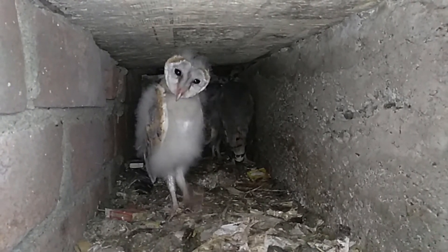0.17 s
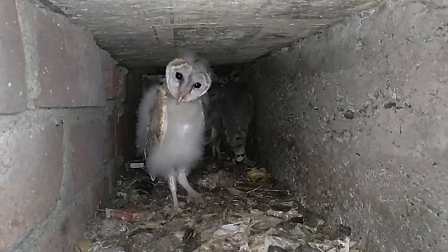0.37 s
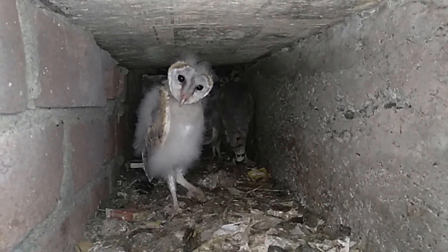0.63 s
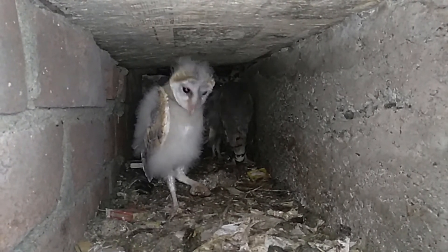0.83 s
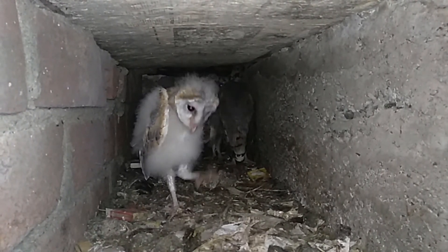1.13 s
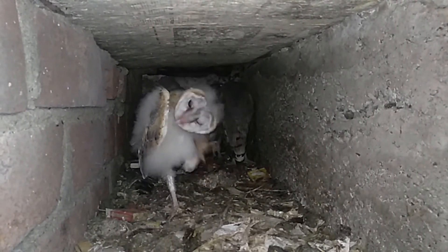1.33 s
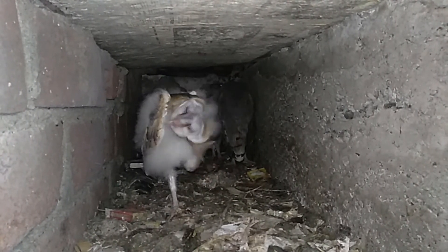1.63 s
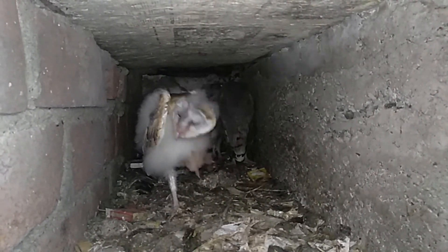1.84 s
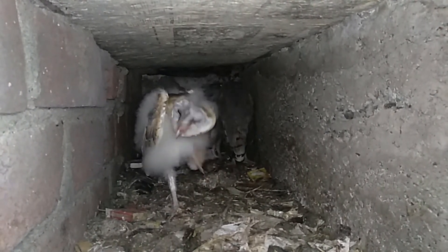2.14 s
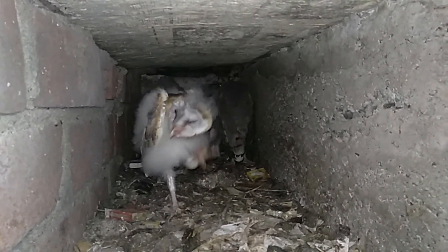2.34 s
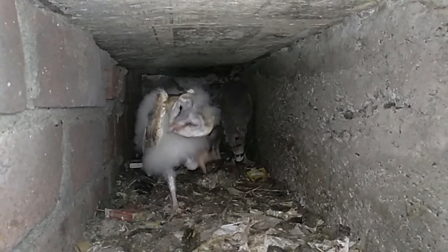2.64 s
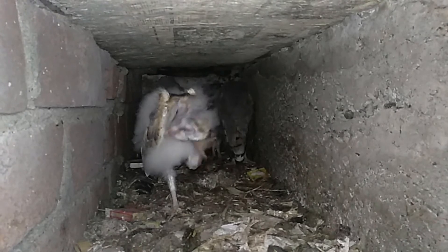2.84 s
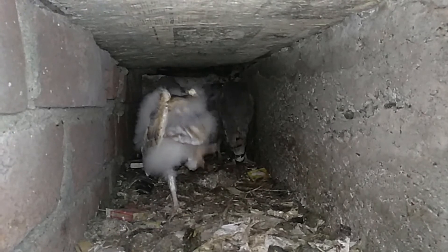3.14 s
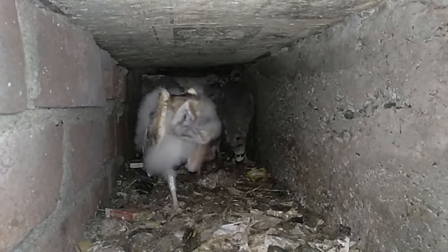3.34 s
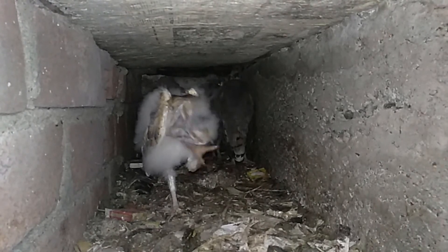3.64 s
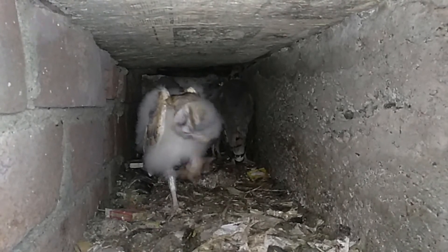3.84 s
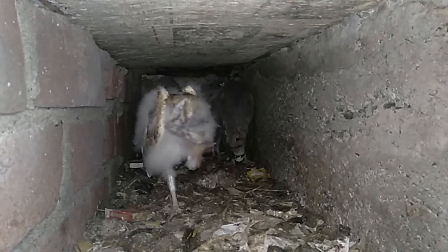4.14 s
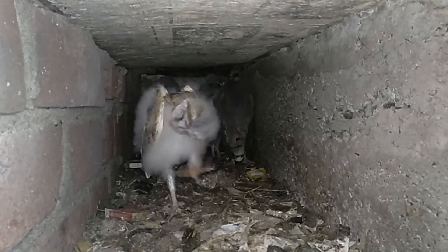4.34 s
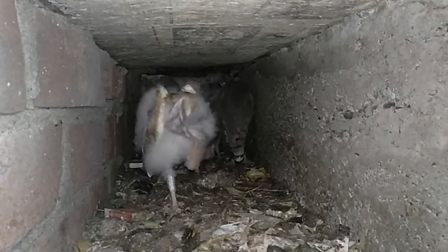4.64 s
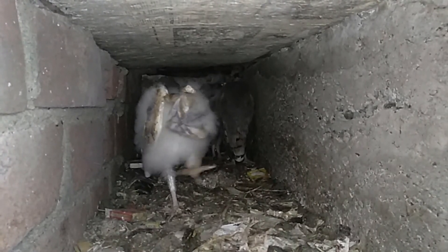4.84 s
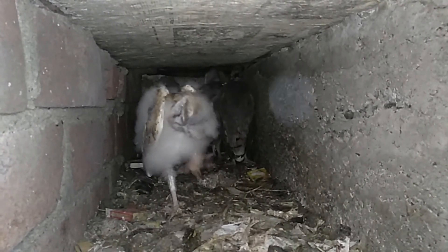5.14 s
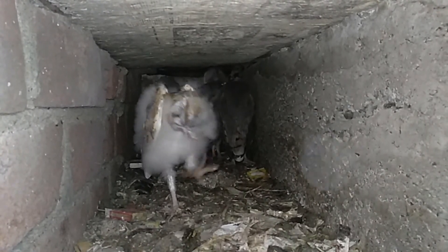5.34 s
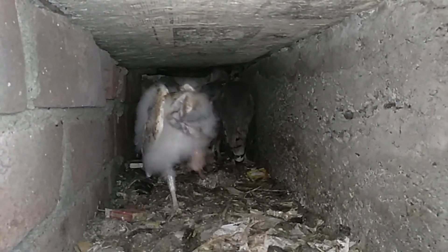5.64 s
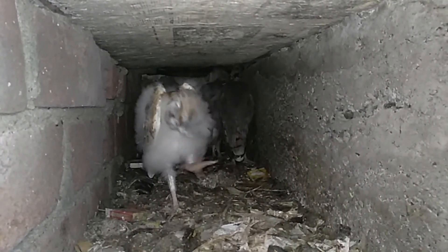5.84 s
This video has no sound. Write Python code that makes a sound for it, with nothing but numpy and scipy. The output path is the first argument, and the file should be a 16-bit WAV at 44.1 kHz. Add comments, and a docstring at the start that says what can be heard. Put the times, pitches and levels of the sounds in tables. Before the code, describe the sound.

A barn owlet is heard close up in a narrow masonry shaft, with short dense wall reflections and a quiet, wavering low rumble under a trace of hiss. At about 0.07, 0.17 and 0.29 seconds come three sharp, hard knocks; the second is strongest, with a hollow low boom. A faint whir fades after them, with soft muffled foot thuds until about 1.2. Light feathery swishes pass mostly between 1 and 2.4. From about 1.5, tiny dry bill ticks run at roughly six per second, unevenly accented, one clearer near 2.36. Low thuds lead into one loud, harsh, noisy screech from 3.5 to 4.16, bright and rasping, opening up as it goes, without clear pitch. It cuts off with a low puff and a very brief falling squeak near 4.18. Quiet nibbling resumes from 4.25, with occasional soft thuds, stronger around 5.6, until six seconds.

```python
"""A barn owlet in a narrow masonry nest shaft, close to the microphone, over a steady low rumble.
Three sharp knocks come first: impulses ring modes of the struck surface and of the air in the shaft.
Then the owlet shuffles, as low-passed thuds, and preens with tiny regular bill ticks of gated noise.
One harsh screech, a noise jet through gliding resonances, ends in a low puff and a falling squeak of partials.
Ticks and thuds go on; dense, quickly fading random echoes give the sounds the closeness of the walls."""
import sys
import numpy as np
from scipy import signal
from scipy.fft import rfft, irfft
from scipy.io import wavfile

SR = 44100
rng = np.random.default_rng(int(sys.argv[2]) if len(sys.argv) > 2 else 0)


def waveform_to_disk(signal):
    """Save audio, clipped to [-1, 1], as 16-bit WAV at the path in sys.argv[1]."""
    frames = np.transpose(np.atleast_2d(signal))
    scaled = np.clip(frames, -1, 1) * 32767
    samples = np.round(scaled).astype(np.int16)
    wavfile.write(sys.argv[1], SR, samples)


N = 264820
T = np.arange(N) / SR  # s
SHAFT_RING_HZ = 5200
SCREECH_START_S, SCREECH_END_S = 3.515, 4.164


def from_db(db):
    """Logarithmic level: decibels to amplitude gain."""
    return 10 ** (np.asarray(db) / 20)


def rms_one(x):
    """Power normalisation: scale to unit mean square."""
    return x / np.sqrt(np.mean(x ** 2) + 1e-20)


def low_pass(x, order, hz):
    """Butterworth filtering: a maximally flat pass band below the cutoff."""
    return signal.sosfilt(signal.butter(order, hz, fs=SR, output="sos"), x)


def dull(x, hz):
    """First-order absorption: a gentle loss of treble."""
    return low_pass(x + 1e-18, 1, min(hz, SR / 3))


def coloured(points):
    """Spectral shaping: noise of rms 1, its spectrum interpolated over log frequency."""
    hz, db = np.transpose(points)
    bins_hz = np.maximum(np.fft.rfftfreq(N, 1 / SR), 1)
    gain = from_db(np.interp(np.log(bins_hz), np.log(hz), db))
    return rms_one(irfft(rfft(rng.standard_normal(N)) * gain, N))


def resonate(x, hz, width_hz):
    """Damped resonance: a pole pair with unit gain at its peak."""
    r = np.exp(-np.pi * width_hz / SR)
    feedback = [1, -2 * r * np.cos(2 * np.pi * hz / SR), r * r]
    return signal.lfilter(np.array([1, 0, -1]) * (1 - r * r) / 2, feedback, x + 1e-18)


def noise_band(hz, width_hz):
    """Cascaded resonance: turbulence passes twice, which steepens the sides of the band."""
    once = resonate(rng.standard_normal(N), hz, width_hz)
    return resonate(once, hz, width_hz)


def flutter(rate_hz):
    """Random modulation: low-passed noise of spread 1."""
    return rms_one(low_pass(rng.standard_normal(N), 2, rate_hz))


def ramp(start_s, length_s):
    """Linear onset: an even rise from 0 to 1."""
    return np.clip((T - start_s) / length_s, 0, 1)


def swell(at_s, half_s, order=2):
    """Bell-shaped envelope of height 1; a higher order flattens its top."""
    return np.exp(-np.minimum(((T - at_s) / half_s) ** order, 50))


def strikes(times, level_db):
    """Impulsive excitation: one single-sample impulse for each contact."""
    out = np.zeros(N)
    out[np.round(np.asarray(times) * SR).astype(int)] = from_db(level_db)
    return out


def fade(clicks, t60):
    """Exponential decay: each impulse becomes an envelope that loses 60 dB in t60 seconds."""
    return signal.lfilter([1], [1, -from_db(-60 / (t60 * SR))], clicks + 1e-18)


def ring(clicks, hz, t60):
    """Modal impulse response: a unit impulse starts a decaying sine of initial height 1."""
    r = from_db(-60 / (t60 * SR))
    w = 2 * np.pi * hz / SR
    return signal.lfilter([0, np.sin(w)], [1, -2 * r * np.cos(w), r * r], clicks + 1e-18)


def background(ring_db=-96.0, waver_db=2.5, waver_top_hz=250, ring_waver_db=2.0):
    """Stationary coloured noise: a rumble whose bass wavers, with a thin band of hiss."""
    # spectrum of the rumble: f/Hz, relative level/dB
    rumble_colour = [(25, -20.5), (50, -16), (80, -1), (105, 7.5), (155, -12), (200, 1), (255, -14),
                     (340, -20.5), (480, -20.5), (700, -29), (1000, -29.5), (2300, -37), (6500, -46.5),
                     (9000, -49)]
    rumble = from_db(-64.0) * coloured(rumble_colour)
    bass_change = from_db(waver_db * flutter(4)) - 1
    rumble = rumble + bass_change * dull(rumble, waver_top_hz)
    hiss = rms_one(noise_band(SHAFT_RING_HZ, 340))
    return rumble + from_db(ring_db + ring_waver_db * flutter(5)) * hiss


def whir(peak_s=.53, half_s=.4, hz=975, width_hz=150, level_db=-87.5):
    """Band-limited noise: a faint narrow whir that swells and dies away, peaking after the knocks."""
    return from_db(level_db) * swell(peak_s, half_s) * rms_one(noise_band(hz, width_hz))


def boom(clicks, build_hz):
    """Coupled resonance: the air in the shaft takes time to swing up after an impulse."""
    # air modes of the shaft: f/Hz, relative level/dB, t60/s of the ring before build-up
    boom_modes = [(59.8, -17, 0.041), (125, 2, .065), (182, 0, 0.042)]
    out = np.zeros(N)
    for hz, db, t60 in boom_modes:
        out += from_db(db) * 2 * resonate(ring(clicks, hz, t60), hz, build_hz)
    return out


def knocks(crack_t60=0.011, crack_width_hz=1800, crack_floor_db=-3.5, crack_top_hz=4500):
    """Modal excitation: each blow touches, then cracks, rings the surface and sets the shaft booming."""
    # blows, levels relative: t/s, boom level/dB, boom build-up width/Hz, clack level/dB,
    # favoured clack f/Hz, loss away from it/(dB per octave), crack level/dB, crack f/Hz, first touch level/dB
    blows = [(0.0655, -69.5, 123, -32, 500, 5.5, -42, 4230, 0),
             (0.1660, -20.5, 39.4, -20.5, 560.7, 1, -32, 4660, -15),
             (0.2900, -29, 85, -29.5, 750, 12, -41, 2700, -16)]
    # ring of the knocked surface: f/Hz, relative level/dB, t60/s
    clack_modes = [(330, -1, 0.053), (495, 0, 0.03), (596, 2, 0.029), (745, -2, .018), (1006, -5, 0.028),
                   (1302, -8.5, 0.023), (1560, -10.5, 0.0065), (1980, -12, 0.017), (2230, -10, 0.016),
                   (2740, -15, 0.0095), (3570, -10, 0.015)]
    # a first touch comes just before each blow, with less crack in it
    touch_lead_s, touch_crack_db = .0022, -6
    s, _, _, clack_db, favoured_hz, focus_db, _, _, touch_db = np.transpose(blows)
    out = np.zeros(N)
    for k, (hz, db, t60) in enumerate(clack_modes):
        # where a blow lands decides which modes it favours
        mode_db = clack_db + db - focus_db * np.abs(np.log2(hz / favoured_hz))
        clicks = strikes(s, mode_db) + strikes(s - touch_lead_s, mode_db + touch_db)
        out += (-1) ** k * ring(clicks, hz, t60)  # alternating polarity
    for at, boom_db, build_hz, _, _, _, crack_db, crack_hz, first_db in blows:
        snap = rms_one(resonate(rng.standard_normal(N), crack_hz, crack_width_hz))
        snap += from_db(crack_floor_db) * rms_one(dull(rng.standard_normal(N), crack_top_hz))
        contacts = strikes([at - touch_lead_s, at], [crack_db + first_db + touch_crack_db, crack_db])
        out += fade(contacts, crack_t60) * snap
        out += boom(strikes([at], boom_db), build_hz)
    return out


def feet_and_puff(level_db=9.0, softness_hz=85, shift_count=8, shift_db=-58.0):
    """Low-pass excitation: soft steps on the litter, and one low puff, excite mainly the lowest air modes."""
    # thuds of shifting feet, and a low puff as the screech ends (4.152 s): t/s, level/dB before level_db
    thuds = [(0.358, -45), (0.383, -45.5), (0.471, -47.5), (0.828, -47), (1.157, -45), (3.158, -48.5),
             (3.185, -46), (3.496, -43), (3.571, -40), (4.152, -48), (4.500, -45.5), (4.89, -46.5),
             (5.091, -48), (5.569, -40.5), (5.622, -42), (5.665, -44)]
    s, db = np.transpose(thuds)
    # lighter shifts of weight come at random
    shifts = strikes(rng.uniform(0, T[-1], shift_count), shift_db + level_db)
    pushes = strikes(s, db + level_db) + shifts
    return boom(dull(dull(pushes, softness_hz), softness_hz), build_hz=29.79)


def swishes(width_share=0.24):
    """Constant relative bandwidth: faint swells of noise whose width is a share of their pitch."""
    # swells: t/s, half length/s, f/Hz, level/dB
    swish_rows = [(0.983, 0.1, 3070, -91.5), (1.312, 0.11, 550, -81), (1.492, 0.073, 1850, -77.5),
                  (1.56, 0.1, 1106, -78), (1.643, 0.086, 2700, -84.5), (1.75, 0.25, 2040, -88.5),
                  (2.321, .067, 1380, -84.5), (3.139, .04, 510, -77), (5.65, .15, 328.3, -80)]
    out = np.zeros(N)
    for s, half_s, hz, db in swish_rows:
        out += from_db(db) * swell(s, half_s) * rms_one(noise_band(hz, width_share * hz))
    return out


def nibbles(nibbles_per_s=6.3, faint_db=-69.5, faint_low_db=-10.5):
    """Periodic rhythm: accented ticks, with faint ones evenly spaced between them."""
    # accented bill ticks, levels relative: t/s, level/dB, low part level/dB
    accents = [(1.4644, -70, -5.5), (1.763, -63.5, -10), (1.916, -58, -13.5), (2.2136, -63, -3),
               (2.358, -46.5, -13), (2.508, -57, -8.5), (2.8176, -56, -11), (3.1233, -63.5, -12.5),
               (3.2798, -54.5, -17), (3.4408, -56.5, -6.5), (4.2495, -54, -17.5), (4.571, -57, -19.5),
               (4.737, -61.5, -20.5), (4.8925, -61.5, -12.5), (5.0435, -58.5, -12.5), (5.375, -63, -10.5),
               (5.5418, -63.5, -3.5), (5.8743, -61.5, -15.5)]
    rows = [accents[0]]
    for before, accent in zip(accents, accents[1:]):
        gap_s = accent[0] - before[0]
        beats = max(round(gap_s * nibbles_per_s), 1)
        for k in range(1, beats):
            rows.append((before[0] + gap_s * k / beats, faint_db, faint_low_db))
        rows.append(accent)
    return np.transpose(rows)


def bill(tick_t60=0.037, bright_db=-11.0, low_db=-4.5, brush_db=-18.5, brush_s=0.016, grain_db=4.0):
    """Frictional noise: each closing of the bill is a tiny rasp inside a grainy brush of barbs."""
    s, db, low_share_db = nibbles()
    nearest = np.searchsorted((s[1:] + s[:-1]) / 2, T)
    grain = from_db(db[nearest] + brush_db + grain_db * flutter(250))
    brush = grain * np.exp(-np.abs(T - s[nearest]) / brush_s)
    touch = dull(fade(strikes(s, db), tick_t60), hz=220) + brush
    bright = from_db(bright_db) * rms_one(noise_band(6090, 1800))
    low = from_db(low_share_db[nearest] + low_db) * rms_one(noise_band(2800, 890))
    return touch * (bright + low)


def gesture():
    """Source control: attack and release of air pressure, opening of the bill, tension of the throat."""
    attack_s, release_s = .056, .054
    # the bill opens in one smooth move and partly shuts as the pressure drops
    open_delay_s, open_s, shut_share = .03, .5, .55
    # tension, a factor on all resonances, rises with the opening and sags in the release
    narrow_tension, open_tension, release_sag = 0.98, 0.99, .035
    attack = ramp(SCREECH_START_S, attack_s)
    release = 1 - ramp(SCREECH_END_S - release_s, release_s)
    opening = np.sin(np.pi / 2 * ramp(SCREECH_START_S + open_delay_s, open_s)) ** 2
    tension = narrow_tension + (open_tension - narrow_tension) * opening - release_sag * (1 - release)
    return attack, release, opening * (1 - shut_share * (1 - release)), tension


def gliding_band(hz, width_hz):
    """Quadrature modulation: slow noise on a sine and cosine makes a moving band of rms 1."""
    slow = low_pass(rng.standard_normal((2, len(hz))), 2, width_hz / 2)
    phase = 2 * np.pi * np.cumsum(hz) / SR
    return rms_one(slow[0] * np.cos(phase) + slow[1] * np.sin(phase))


def screech(rasp_db=0.36, waver_db=0.34, pressure_power=1.4,
            lower_db=-0.55, lower_open_db=4.5, lower_slack_db=18.0):
    """Source and filter: a turbulent jet drives resonances moved by bill opening and throat tension."""
    # resonances before tension, levels relative:
    # narrow f/Hz, open f/Hz, width/Hz, narrow level/dB, open level/dB
    hiss_modes = [(2880, 2850, 200, -21, -30), (3330, 3280, 190, -12, -9), (3560, 3530, 170, -13, -10),
                  (3930, 3900, 260, -13, -10), (4160, 4230, 200, -8, -12), (4400, 4540, 260, -16, -8),
                  (4980, 5040, 260, -2, 1), (5380, 5590, 220, 0, 2), (5560, 6130, 380, 0, 2),
                  (5970, 5960, 200, -2, 5), (6180, 6250, 140, -7, -7), (6610, 6590, 200, -4, -3),
                  (6860, 6820, 200, -10, -10), (7250, 7180, 300, -15, -19), (9050, 9200, 450, -13, -15),
                  (9650, 9950, 800, -8, -4), (10650, 10700, 600, -16, -16), (12800, 12850, 400, -21, -21),
                  (13450, 13800, 800, -19, -15), (14500, 14550, 700, -27, -25)]
    # colour of the rush of air: f/Hz, relative level/dB
    rush_colour = [(250, -20), (780, -19), (1100, 3), (1600, -1.5), (2000, 2), (2400, -1.5), (2900, -5),
                   (5000, 3), (8000, 6.5), (15000, -10)]
    # level with the bill narrow, gain as it opens, opening (0-1) at which the gain is complete
    narrow_level_db, opening_gain_db, loud_opening = -30.5, 3, .42
    # the rush needs little pressure, so it starts and stops quickly; its gate bounds the whole screech
    rush_db, rush_attack_s, rush_release_s = -48.5, .02, .006
    gate = ramp(SCREECH_START_S, rush_attack_s) * (1 - ramp(SCREECH_END_S - rush_release_s, rush_release_s))
    on = gate > 0
    attack, release, opening, tension = (control[on] for control in gesture())
    pressure = attack * release
    level_db = narrow_level_db + opening_gain_db * np.minimum(opening / loud_opening, 1)
    effort = pressure ** pressure_power * from_db(level_db)
    # a wide bill or a slack jet favours the lower resonances
    lower_share_db = lower_db + lower_open_db * opening ** 4 + lower_slack_db * (1 - pressure)
    jet, power, hiss = 0, 0, np.zeros(N)
    for narrow_hz, open_hz, width_hz, narrow_db, open_db in hiss_modes:
        is_lower = narrow_hz < 4750
        db = narrow_db + opening * (open_db - narrow_db) + is_lower * lower_share_db
        gain = from_db(db) * np.sqrt(width_hz)
        centre_hz = tension * (narrow_hz + opening * (open_hz - narrow_hz))
        jet = jet + gain * gliding_band(centre_hz, width_hz)
        power = power + gain ** 2
    hiss[on] = effort * jet / np.sqrt(power)
    # the jet sputters quickly and wavers slowly
    sputter = from_db(rasp_db * flutter(260) + waver_db * flutter(40))
    rush = from_db(rush_db) * coloured(rush_colour)
    # the throat sounds hollow until it has widened, and again while it closes
    widening = swell(SCREECH_START_S, .22, order=4)
    closing = from_db(-2.0) * swell(SCREECH_END_S, .09)
    narrowness = widening + from_db(-18.0) + closing
    hollow = from_db(-55.5) * narrowness * rms_one(noise_band(473, 210))
    return gate * (sputter * (hiss + rush) + hollow)


def squeak(peak_s=4.1795, level_db=-41.5, rise_s=0.0076, fall_s=.0048,
           peak_hz=1305, fall_octaves_per_s=28.0, jitter=.04, rough_db=1.5):
    """Harmonic vibration: as pressure drops the membranes briefly move in step, falling in pitch."""
    # partials: multiple of the pitch, relative level/dB
    squeak_partials = [(1, 0), (2, -25), (3, -10), (4, -11), (5, -16)]
    t = T - peak_s
    on = np.abs(t) < .025
    pitch_hz = peak_hz * 2 ** (-fall_octaves_per_s * t * on)
    phase = 2 * np.pi * np.cumsum(pitch_hz * (1 + jitter * flutter(720))) / SR
    partials = np.zeros(N)
    for k, part_db in squeak_partials:
        partials += from_db(part_db + rough_db * flutter(300)) * np.sin(k * phase)
    envelope = np.exp(-np.abs(t * on) / np.where(t < 0, rise_s, fall_s))
    return on * from_db(level_db) * envelope * partials


def cancelled(x, depth=0.61):
    """Destructive interference: echoes off the near walls carve fixed valleys into a sound."""
    # valleys: f/Hz, width/Hz
    notches = [(800, 200), (2390, 110), (3080, 90), (3740, 90), (4700, 130), (5310, 110), (6400, 160),
               (7080, 70)]
    for hz, width_hz in notches:
        x = x - depth * resonate(x, hz, width_hz)
    return x


def far_end(x, echo_db=-24.5, echo_t60=0.2, arrival_s=0.0068, bright_db=6.5, low_cut_hz=700):
    """Delayed reverberation: sound runs down the shaft and returns as a soft, bright tail."""
    t = T[:SR // 2]
    arrival = 1 - np.exp(-(t / arrival_s) ** 2)
    tail = rng.standard_normal(len(t)) * from_db(-60 * t / echo_t60) * arrival
    tail = tail - dull(tail, low_cut_hz) + from_db(bright_db) * resonate(tail, SHAFT_RING_HZ, 600)
    return x + from_db(echo_db) * signal.fftconvolve(x, tail / np.linalg.norm(tail))[:N]


def shaft(x, early_db=-11.0, early_t60=0.045, late_db=-33.5, late_t60=0.42, ring_db=5.0):
    """Diffuse reverberation: close walls give dense quick reflections; a faint bright ring lingers."""
    t = T[:SR // 2]
    decays = from_db(-60 * t / np.array([[early_t60], [late_t60]]))
    early, late = rng.standard_normal((2, len(t))) * decays
    early = early - dull(early, hz=940)
    late = late + from_db(ring_db) * resonate(late, SHAFT_RING_HZ, 300)
    echoes = from_db(early_db) * early / np.linalg.norm(early)
    echoes += from_db(late_db) * late / np.linalg.norm(late)
    return x + signal.fftconvolve(x, echoes)[:N]


def scene():
    """Superposition: the owlet's sounds reverberate in the shaft, and the background is added dry."""
    call = cancelled(screech() + squeak())
    contacts = far_end(knocks() + bill())
    return (shaft(call + contacts + feet_and_puff() + swishes() + whir()) + background())[None]


def record(dry, edge_hz=7300, leak_db=-31.5, self_noise_db=-96.0, cutoff_hz=15300):
    """Band limiting: a narrow-band microphone with self-noise passes only a trace of the high treble."""
    band = signal.sosfilt(signal.ellip(8, .5, 70, edge_hz, fs=SR, output="sos"), dry)
    top = signal.sosfilt(signal.butter(6, 8500, "high", fs=SR, output="sos"), dry)
    out = band + from_db(leak_db) * top + from_db(self_noise_db) * rng.standard_normal(dry.shape)
    return signal.sosfilt(signal.ellip(10, .2, 80, cutoff_hz, fs=SR, output="sos"), out)


dry = scene()
out = record(dry)
waveform_to_disk(out)
```